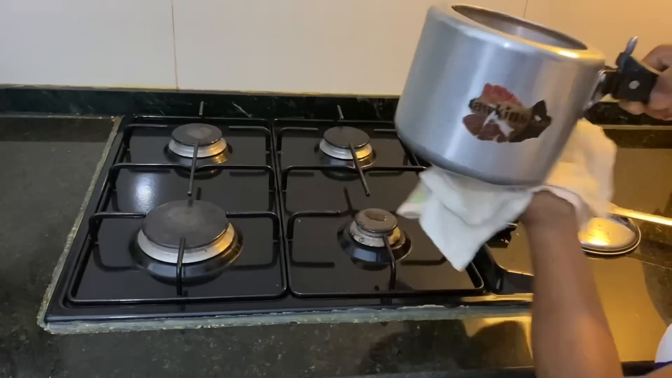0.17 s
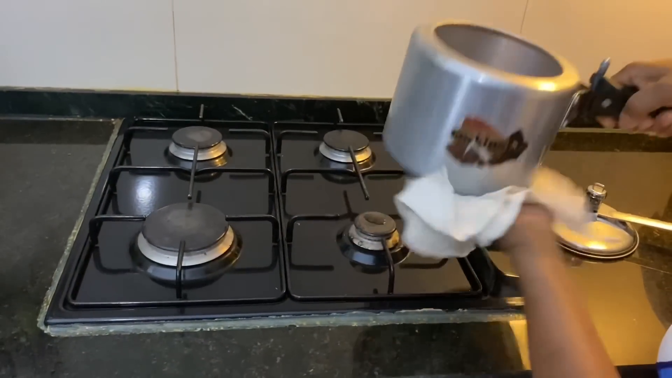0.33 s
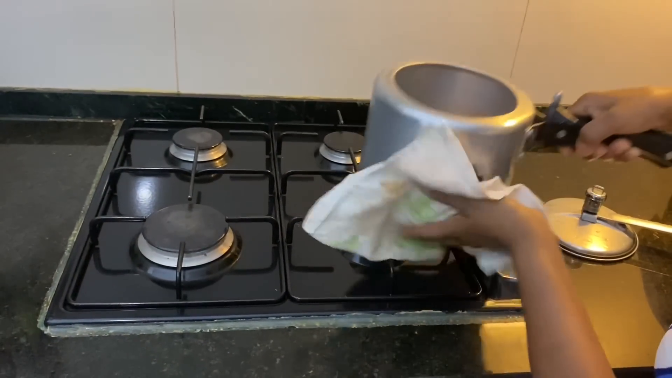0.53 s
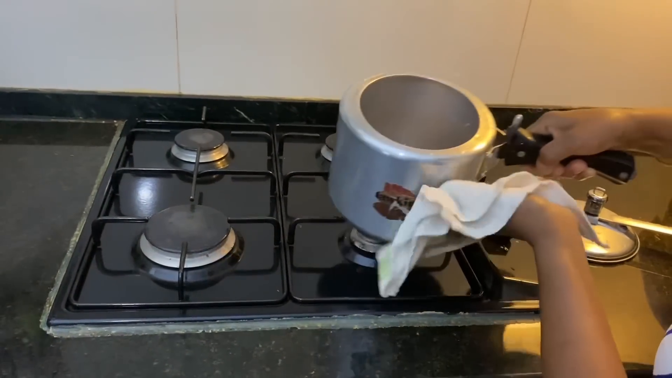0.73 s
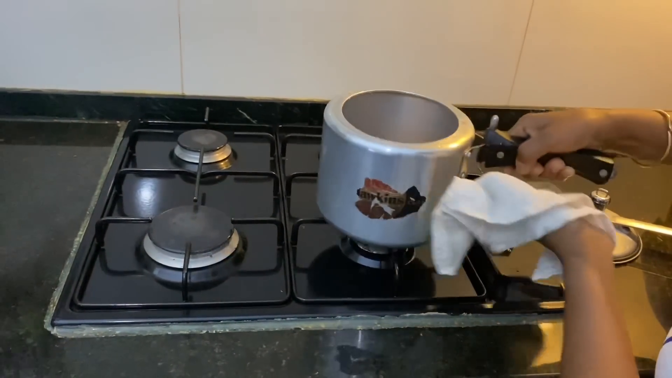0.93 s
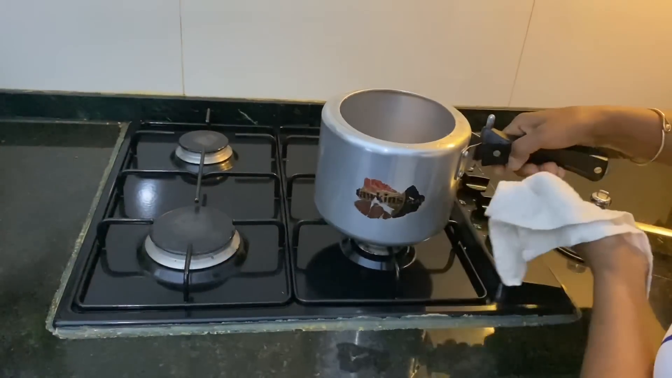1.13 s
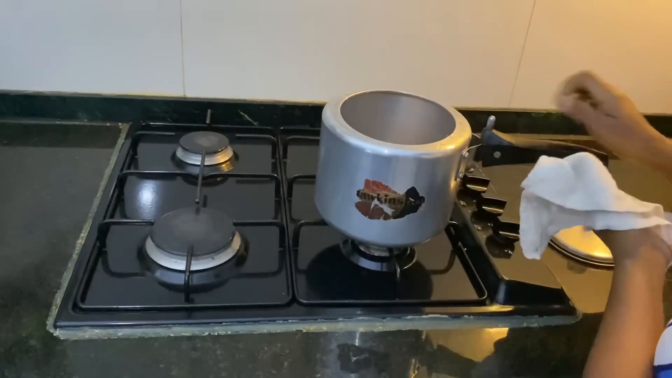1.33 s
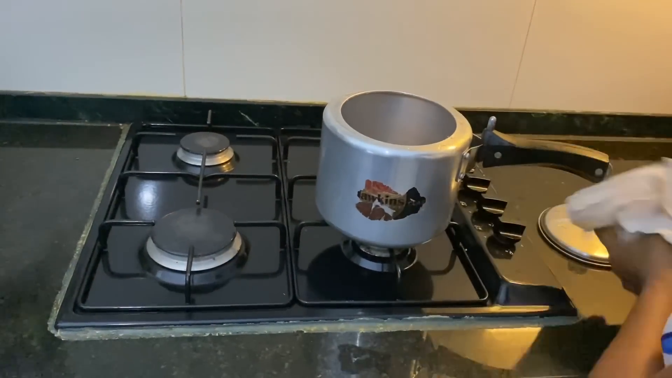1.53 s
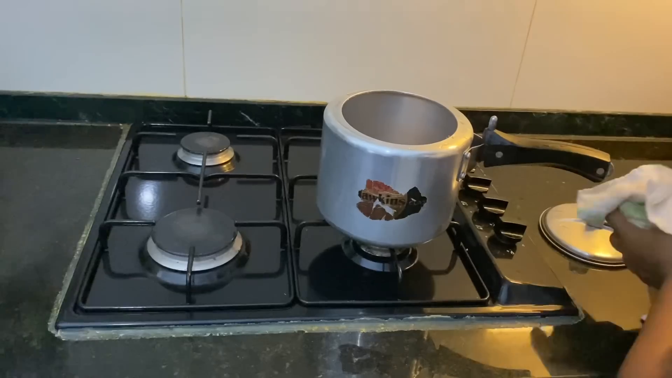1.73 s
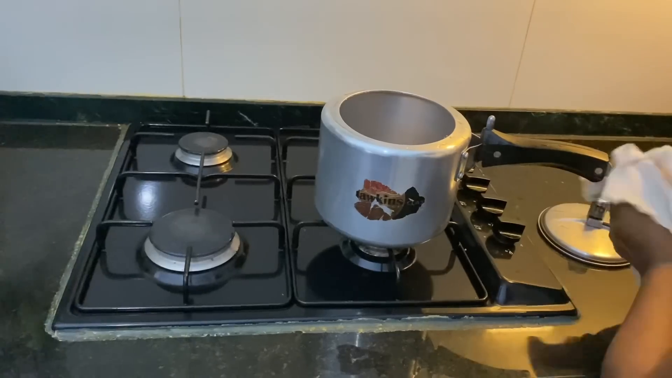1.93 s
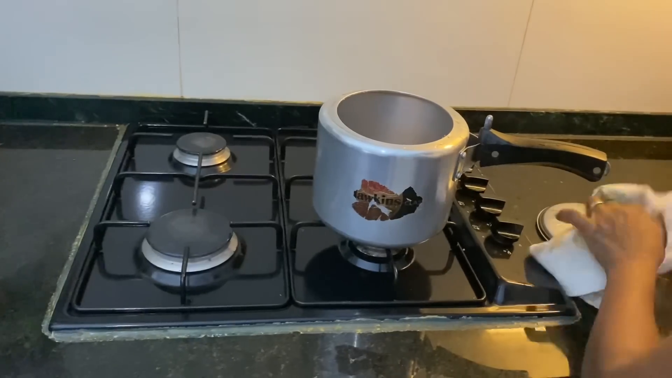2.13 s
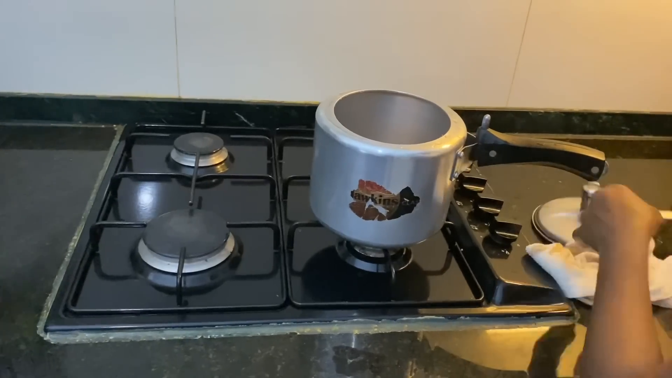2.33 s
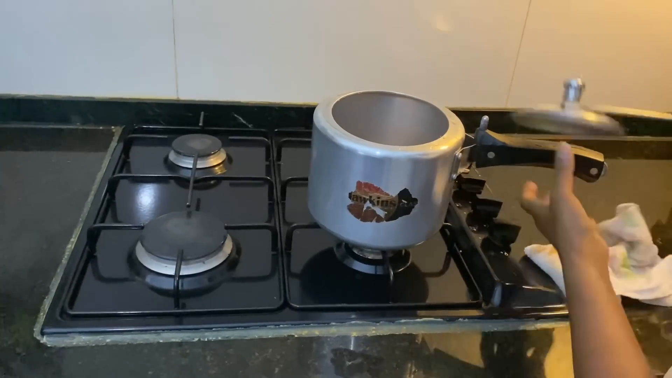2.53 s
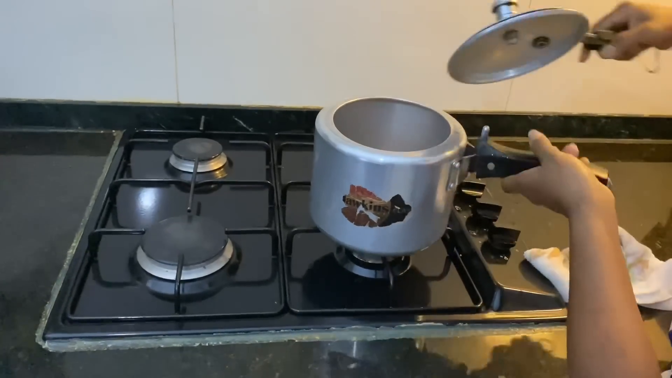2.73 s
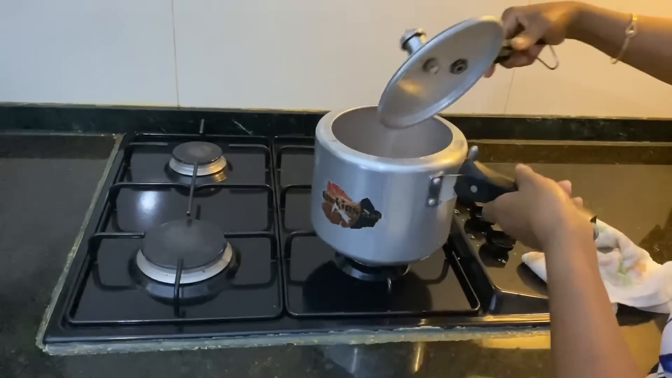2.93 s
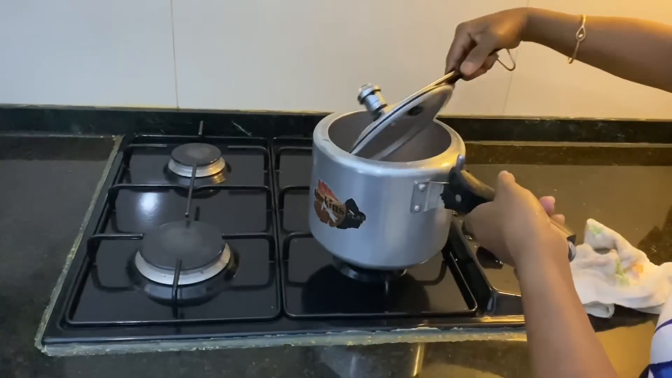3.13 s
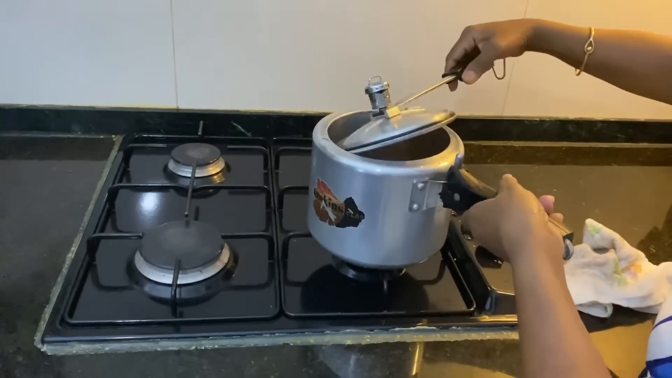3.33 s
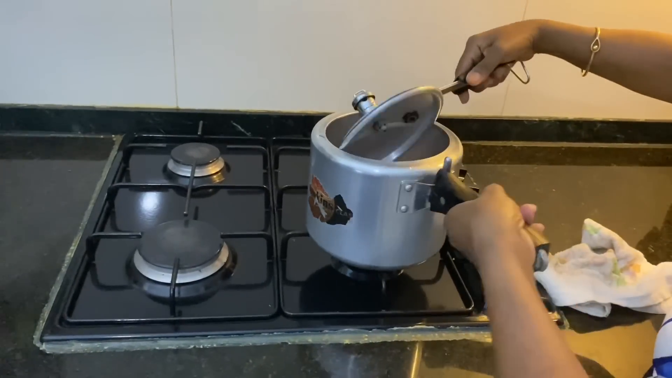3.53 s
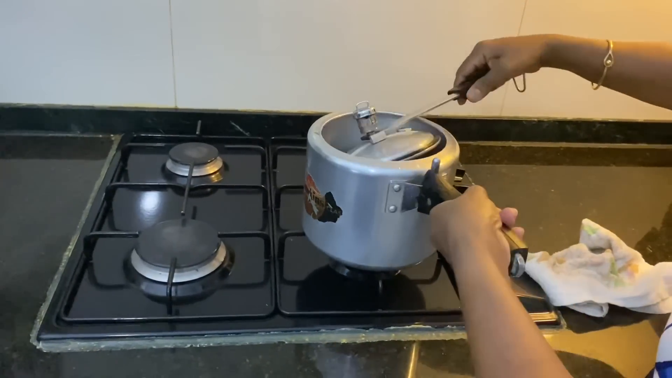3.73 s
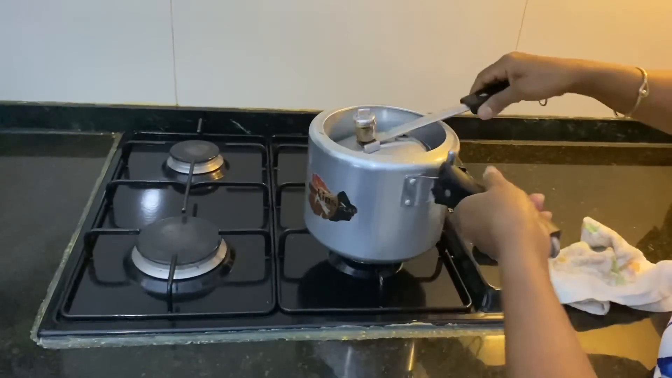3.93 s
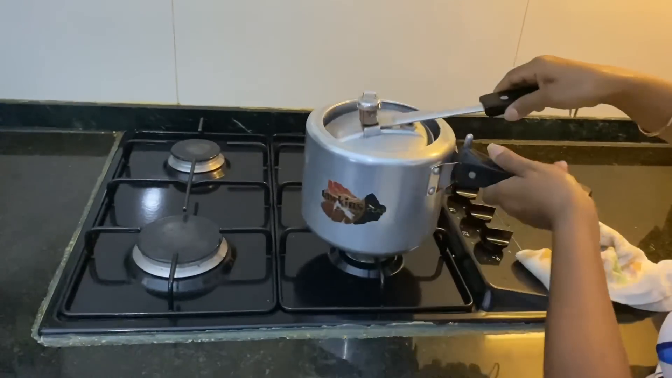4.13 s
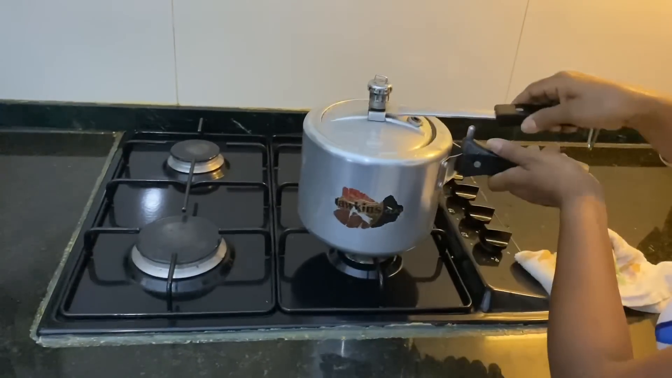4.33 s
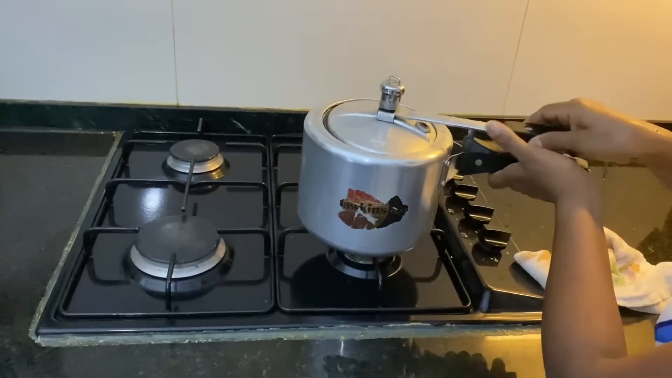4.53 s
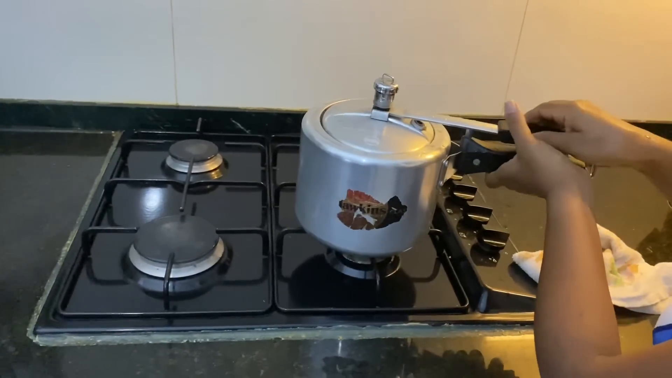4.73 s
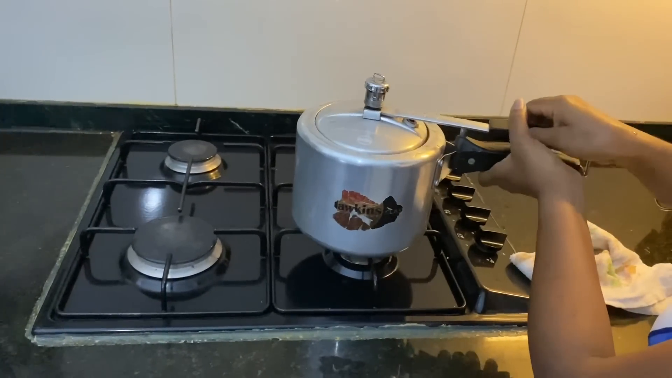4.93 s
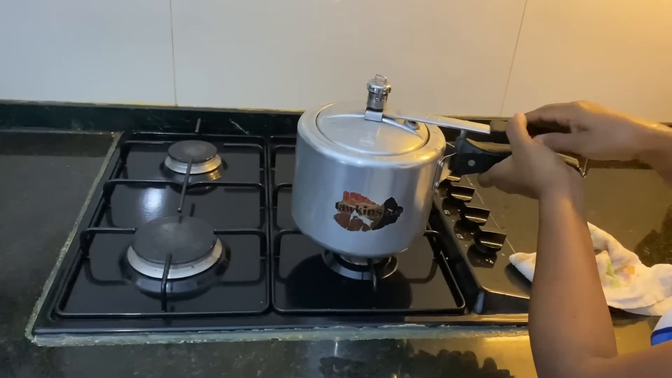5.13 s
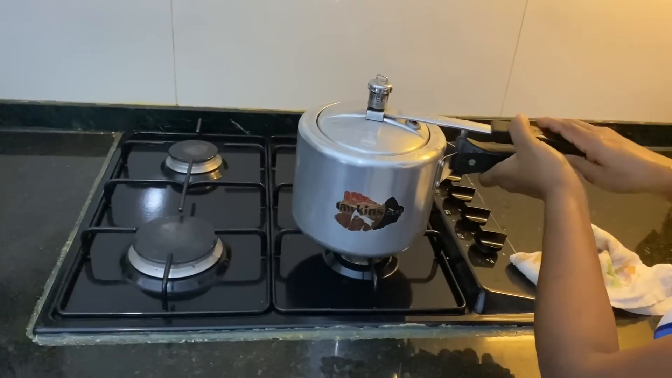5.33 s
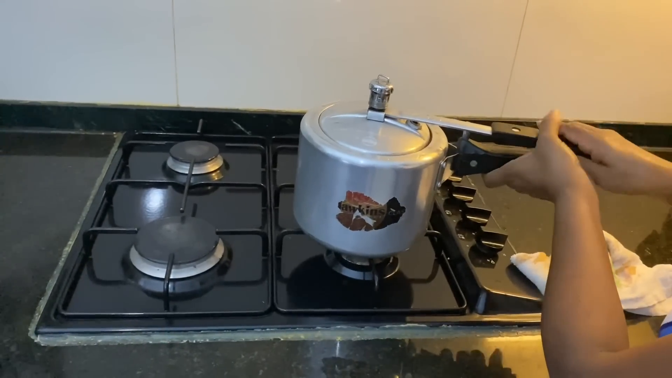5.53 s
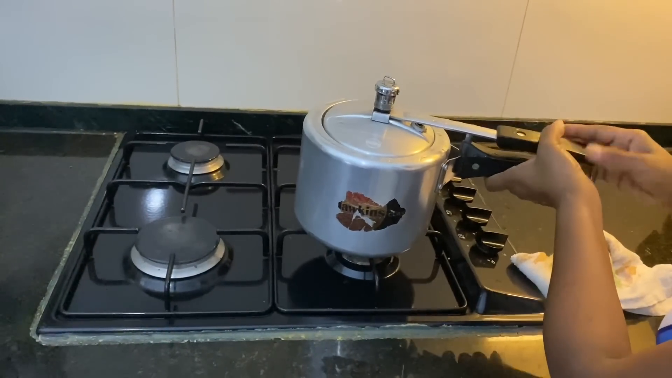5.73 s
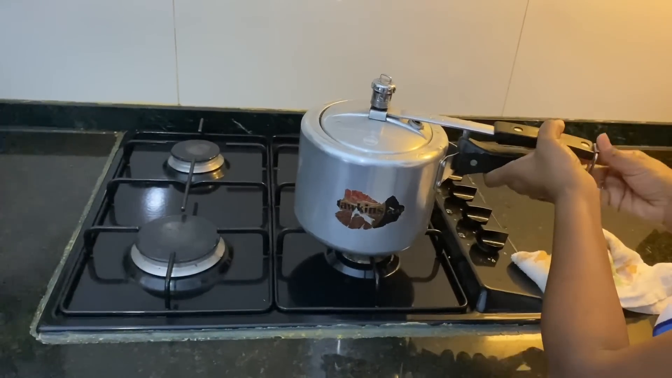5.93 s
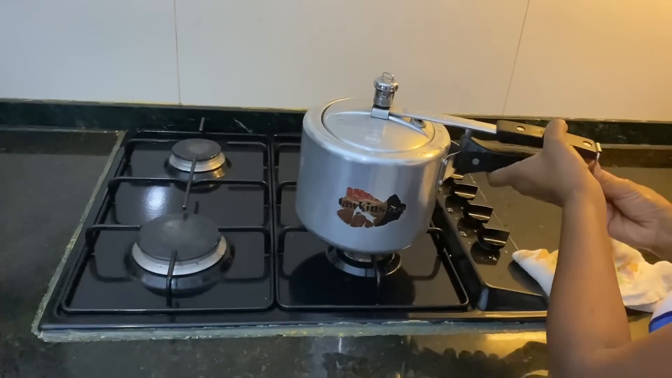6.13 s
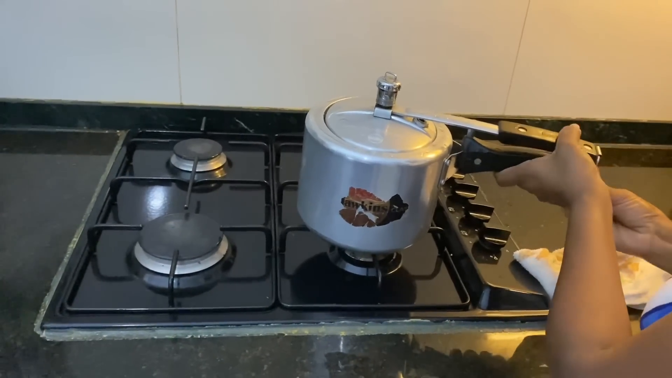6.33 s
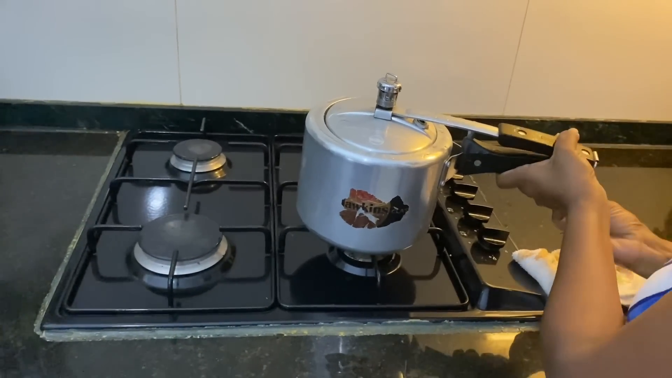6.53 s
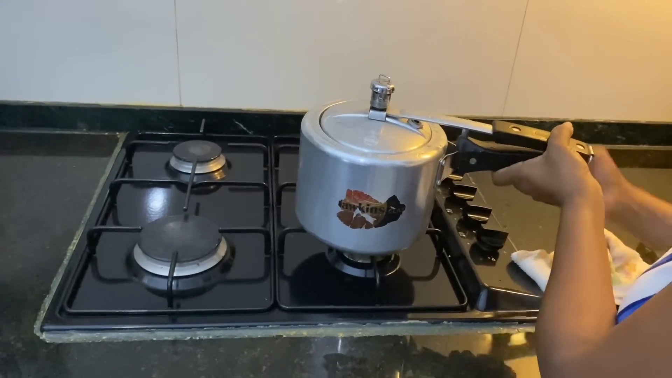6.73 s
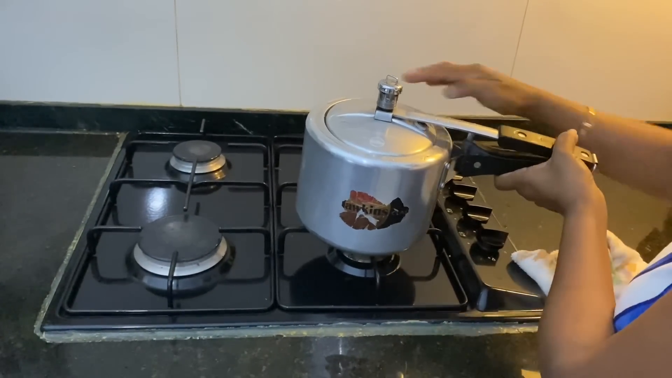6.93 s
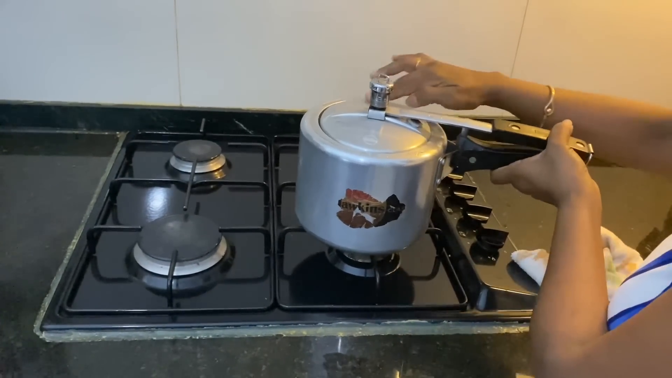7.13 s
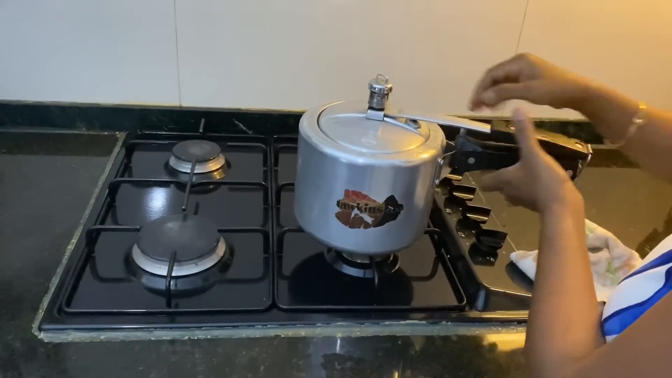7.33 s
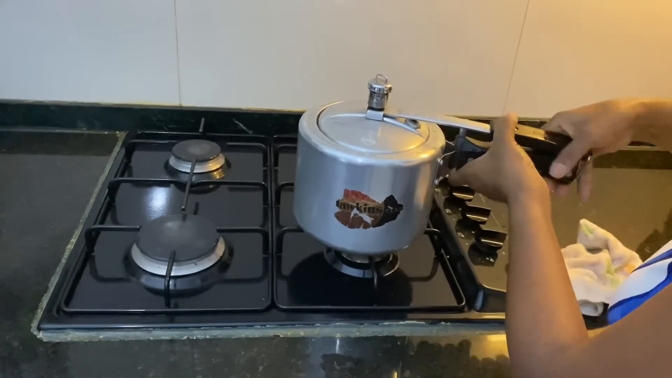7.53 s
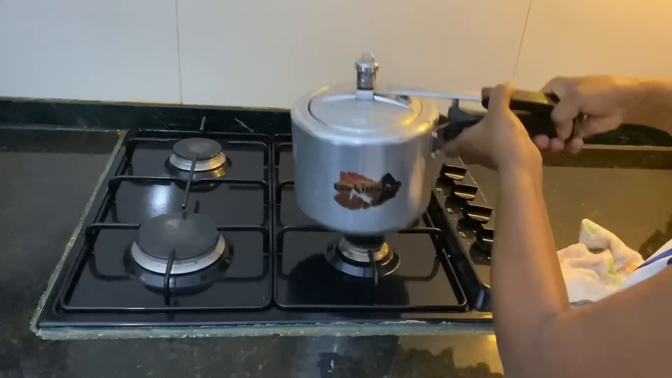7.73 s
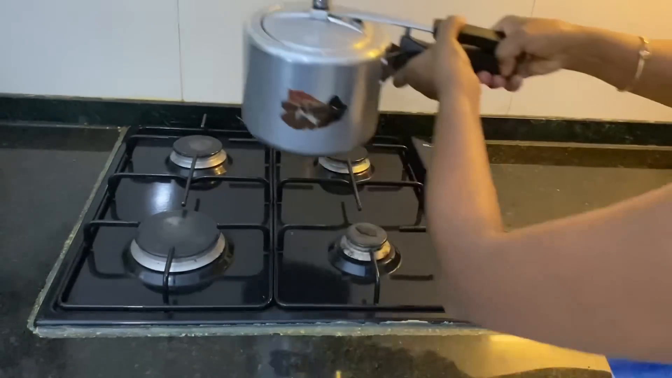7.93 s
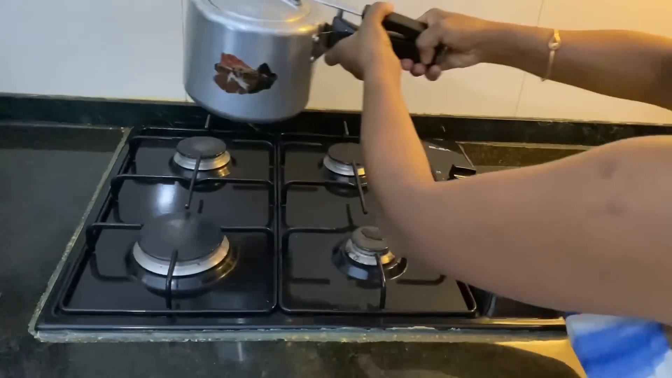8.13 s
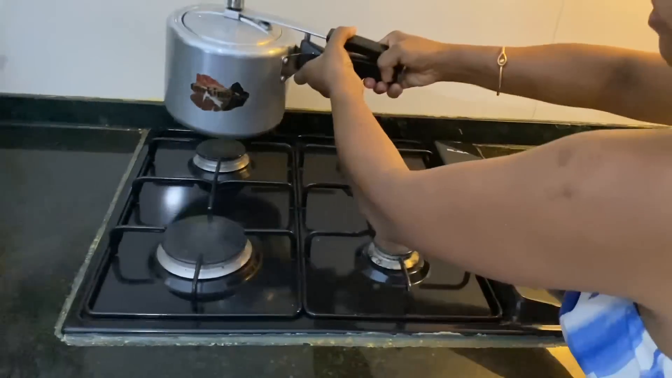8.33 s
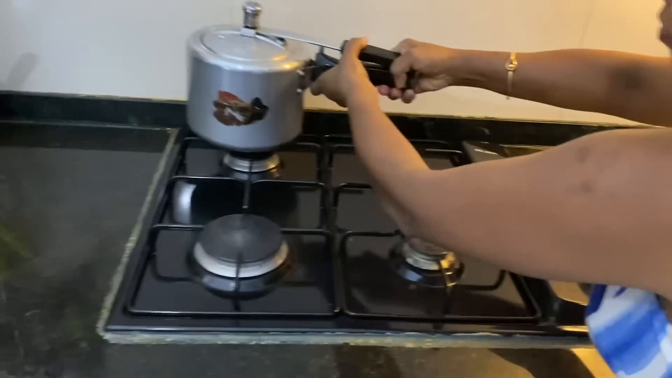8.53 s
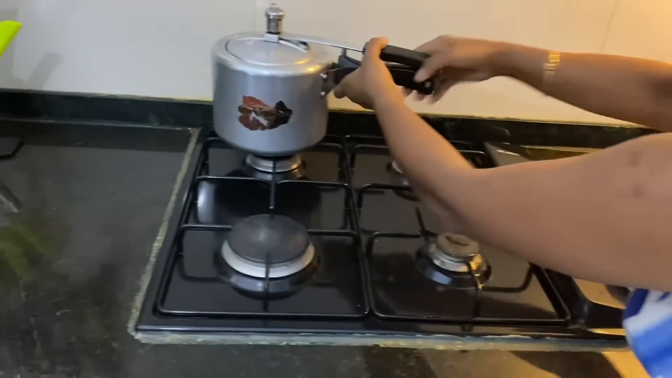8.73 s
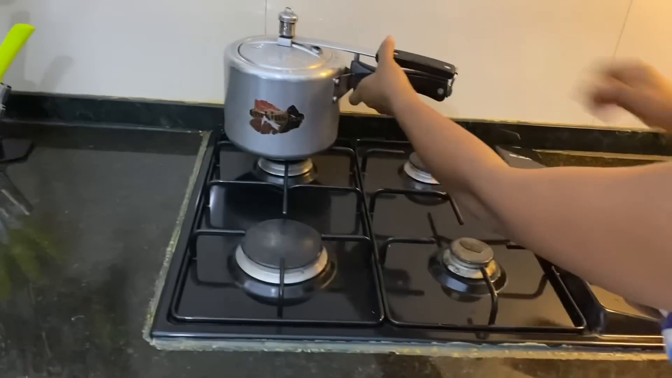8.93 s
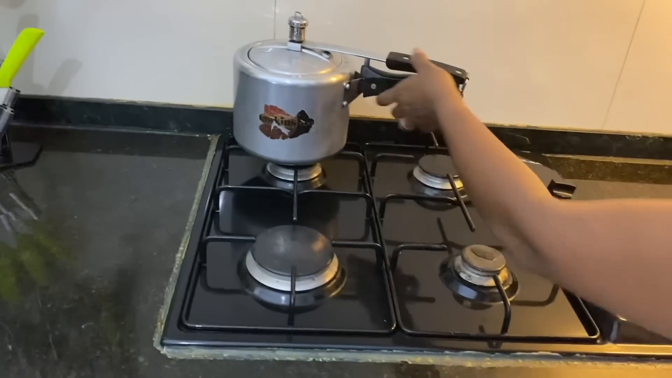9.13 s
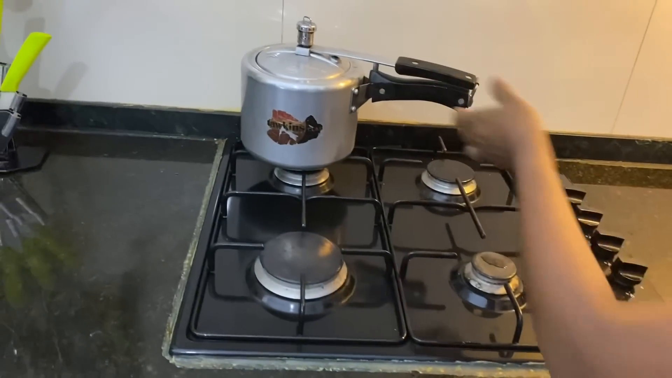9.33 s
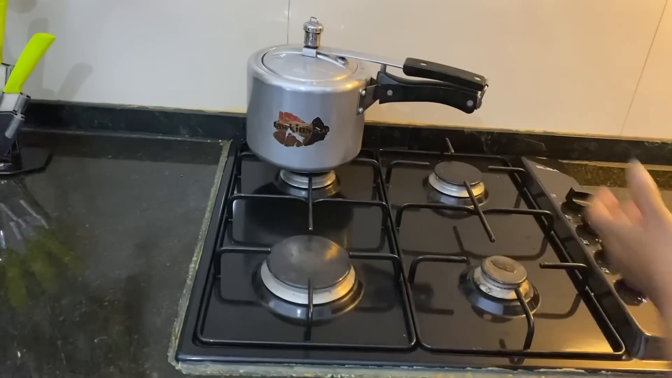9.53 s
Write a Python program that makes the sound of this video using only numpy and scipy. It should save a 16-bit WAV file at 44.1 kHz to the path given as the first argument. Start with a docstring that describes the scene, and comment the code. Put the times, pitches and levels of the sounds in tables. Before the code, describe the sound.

Close stereo phone pickup of an empty aluminium pot on a gas hob: dull double clunk with grate rattle, soft cloth rustle, lid lifted with light clinks, hard clanks and gritty metal sliding as it is fitted, dry clicks of handles and lock, a quiet gap, then a final heavy rattling set-down. Steady low hum and faint appliance noise, short bright room echo.

```python
"""The lid of an aluminium pressure cooker is slid in, turned and locked: each knock is a noise crack with decaying
modes of lid, wall and belly air; sliding drives the same metal and an air resonance with grains of noise.
Handles and lock click as short rough note clusters; the base bumps and rattles on an iron grate; a cloth rustles.
Mains hum and patchy appliance noise fill a hard-walled kitchen, and a phone spreads the treble in stereo."""
import sys
import numpy as np
from scipy import signal
from scipy.fft import rfft, irfft, next_fast_len
from scipy.io import wavfile
from scipy.ndimage import uniform_filter1d, map_coordinates

SR = 44100
rng = np.random.default_rng(int(sys.argv[2]) if len(sys.argv) > 2 else 0)


def inscribe(sig):
    """Save sig as 16-bit PCM at rate SR to the path in sys.argv[1].

    A 1-D sig is mono; a 2-D sig holds one channel per row.
    Samples are clipped to [-1, 1] before scaling.
    """
    pcm = np.round(np.clip(np.atleast_2d(sig).T, -1, 1) * 32767)
    wavfile.write(sys.argv[1], SR, pcm.astype(np.int16))


N = 426888


def amp(db):
    """Decibels are logarithmic: 20 dB is a factor of ten in amplitude."""
    return np.exp(np.log(10) / 20 * np.asarray(db))


def unit(x):
    """Normalisation to an rms of 1 sets the mean power."""
    return x / np.sqrt(np.mean(x ** 2) + 1e-20)


def along(points, hz):
    """Interpolation of (Hz, value) points on a logarithmic frequency axis, as pitch is heard."""
    f, v = np.transpose(points)
    return np.interp(np.log(hz + 1), np.log(f + 1), v)


def wobble(rate):
    """Slow random modulation: a smooth curve through random knots, rate of them a second."""
    at = np.arange(0, N + 8, 8)
    knots = rng.standard_normal(int(N * rate / SR) + 4)
    return np.interp(np.arange(N), at, map_coordinates(knots, [at * rate / SR]))


def filtered(x, response):
    """Linear filtering: the spectrum is multiplied by a complex response of frequency."""
    n = x.shape[-1]
    m = next_fast_len(n + 8192)
    return irfft(rfft(x, m) * response(np.fft.rfftfreq(m, 1 / SR)), m)[..., :n]


def lowpass(x, corner_hz):
    """A steep zero-phase low-pass leaves the bass of a sound."""
    return filtered(x, lambda hz: 1 / (1 + (hz / corner_hz) ** 4))


def place(out, s, sound):
    """Superposition: a sound is added from its start in seconds."""
    out[round(s * SR):][:len(sound)] += sound


# Likeness of left and right in diffuse sound. Each row: frequency in Hz, correlation from 0 to 1.
PORT_LIKENESS = [(60, 0.94), (130, 0.69), (300, 0.64), (700, 0.06), (1400, 0.07), (3000, 0.41),
                 (7000, 0.51)]


def diffuse(pair, spectrum):
    """Coherence of a diffuse field: two unrelated signals are coloured and mixed to a set likeness."""
    def response(hz):
        turn = np.arccos(np.clip(along(PORT_LIKENESS, hz), -1, 1)) / 2
        return amp(along(spectrum, hz)) * [np.cos(turn), np.sin(turn)]
    mid, side = filtered(pair, response)
    return np.array([mid + side, mid - side])


def crack(colour, t60):
    """Impact noise: a bright tick dies first, while the bass rises and dies more slowly."""
    t = np.arange(SR // 4) / SR
    noise = filtered(rng.standard_normal(len(t)), lambda hz: amp(along(colour, hz)))
    bass = lowpass(noise, 900)
    edge = filtered(noise, lambda hz: 1 / (1 + (7000 / (hz + 1)) ** 4))
    treble = (noise - bass) * amp(-60 * t / t60) + 2.2 * edge * amp(-60 * t / 0.017)
    treble *= 1 - np.exp(-t / 0.0018)
    return treble + bass * amp(-60 * t / (1.9 * t60)) * (1 - np.exp(-t / 0.0039))


def ringing(hz, db, t60, rough, size=SR // 4):
    """Modal decay: each mode (column) is a dying sine; a random phase wander roughens the ring."""
    t = np.arange(size) / SR
    steps = rng.standard_normal((len(hz), len(t) // 10 + 1))
    wander = rough * np.cumsum(steps, axis=1).repeat(10, axis=1)[:, :len(t)]
    modes = amp(db - 60 * t / t60) * np.sin(2 * np.pi * hz * t + wander)
    return np.sum(modes, axis=0) * (1 - np.exp(-t / 0.00027))


def grains(lumpy_db):
    """Friction as shot noise: dense tiny impacts of uneven size come in lumps over steady noise."""
    ticks = (rng.random(N) < 4000 / SR) * rng.standard_normal(N)  # about 4000 impacts a second
    return unit(unit(ticks) * amp(lumpy_db * wobble(60)) + 0.81 * rng.standard_normal(N))


RISE_S = .005


def strokes(rows, channels):
    """Envelope of a movement (s, dB per layer, hold s, fall dB/s per layer): quick rise, hold, steady fall."""
    out, t = np.zeros((channels, N + SR)), np.arange(SR // 2) / SR
    for s, db, hold_s, fall in rows:
        falling_s = np.clip(t - RISE_S - hold_s, 0, None)
        shape = np.clip(t / RISE_S, 0, 1) * amp(np.c_[db] - np.c_[fall] * falling_s)
        part = out[:, round(s * SR):][:, :len(t)]
        part[:] = np.maximum(part, shape)  # where movements overlap, the louder counts
    return out[:, :N]


# Partials of the mains hum. Each row: multiple of the mains frequency, level in dB against the fundamental.
HUM_PARTIALS = [(1, 0), (2, -22), (3, -23), (4, -28), (5, -25), (6, -28), (9, -29)]
# Colour of the appliance noise. Each row: frequency in Hz, relative level in dB per Hz.
APPLIANCE_COLOUR = [(22, -19.5), (45, -3), (70, 10), (90, -0.5), (304, -9.5), (448, -9), (602, -12),
                    (839, -19.5), (1130, -23.5), (1430, -30.5), (2680, -30), (5720, -53), (7000, -30),
                    (7400, -44.5), (11000, -44), (13000, -46.5), (17000, -68)]
MAINS_HZ, HUM_DB, KITCHEN_DB = 59.7, -44, -51.5  # mean frequency, fundamental and noise levels
DIP_S, DIP_DB, DIP_WIDTH_S = 5.6, -7, .015  # the hum dips briefly once
HUM_WAVER_DB, HUM_WAVER_RATE = .6, 8  # spread of the level in dB, knots a second


def kitchen():
    """Harmonic series and diffuse noise: an unsteady mains hum lies over patchy appliance noise."""
    t = np.arange(N) / SR
    phase = 2 * np.pi * MAINS_HZ * t + 0.32 * wobble(0.95)
    hum = sum(amp(db + 0.9 * (k > 1) * wobble(11)) * np.sin(k * phase + k * k) for k, db in HUM_PARTIALS)
    dip_db = DIP_DB * np.exp(-((t - DIP_S) / DIP_WIDTH_S) ** 2)
    hum *= np.sqrt(2) * amp(HUM_DB + dip_db + HUM_WAVER_DB * wobble(HUM_WAVER_RATE))
    z = signal.stft(rng.standard_normal((2, N)), nperseg=512)[2]
    # random levels smoothed over frequency, then time, make the noise patchy
    patches = uniform_filter1d(rng.standard_normal(z.shape[1:]), size=6, axis=0)
    patches = uniform_filter1d(patches, size=14, axis=1)
    pair = signal.istft(z * amp(0.8 * unit(patches)), nperseg=512)[1][:, :N]
    return hum + amp(KITCHEN_DB) * unit(diffuse(pair, APPLIANCE_COLOUR))


# An earlier knock still rings in the empty pot. Each row: frequency in Hz, level in dB, t60 in seconds.
LAST_RING = [(940, -61, 1), (4430, -94.5, .8), (6620, -67, 1)]


def linger():
    """Free decay: the last of a ring that began earlier dies away at the start."""
    hz, db, t60 = np.transpose(LAST_RING)[:, :, None]
    sound = ringing(hz, db, t60, rough=0.1, size=SR // 2)
    return np.pad(sound, (0, N - len(sound)))


# Course of the rustling. Each row: time in seconds, level in dB before a common trim.
CLOTH_LEVELS = [(0, -58.5), (.61, -59.5), (.76, -71), (.9, -67), (1.25, -53), (1.33, -62), (1.52, -64),
                (2.25, -67), (5.3, -68), (5.82, -57.5), (6.0, -62), (6.5, -65), (6.73, -71.5), (7.15, -67),
                (7.75, -71), (8.04, -69.5), (8.23, -67.5), (9.25, -70.5), (9.371, -89), (9.68, -55)]
# Colour of the rustling. Each row: frequency in Hz, relative level in dB per Hz.
CLOTH_COLOUR = [(500, -2.5), (1500, -5.5), (3000, 2), (7000, -4.5), (11000, -3), (13000, -10), (15500, -14),
                (17000, -35.5)]


def cloth():
    """Friction noise: cloth and hands rub softly, fine grains in a hiss."""
    fine = rng.standard_normal(N) * amp(1.2 * wobble(25) + 1.2 * wobble(400))
    hiss = unit(filtered(fine, lambda hz: amp(along(CLOTH_COLOUR, hz))))
    return amp(np.interp(np.arange(N) / SR, *np.transpose(CLOTH_LEVELS)) - 4.5) * hiss


# The base rattles after it lands or shifts. Each row: start in seconds, treble level in dB before a common
# trim, hold in seconds, bass over treble in dB.
RATTLES = [(0.919, -27, 0.053, 2), (1.046, -25, 0.048, 1.5), (2.717, -28.5, 0.25, 1.7),
           (2.891, -19, .021, -2.5), (7.589, -60.5, .06, 10.5), (7.657, -44.5, .004, 3.5),
           (8.592, -23.5, .02, 3), (8.625, -26, 0.094, 0.5), (8.758, -30, 0.0049, 3.5),
           (8.987, -42.5, .004, 1), (9.192, -47, 0.0039, 4)]
# Colour of grate and hob top. Each row: frequency in Hz, relative level in dB per Hz.
GRATE_COLOUR = [(35, -26.5), (60, -3), (185, -7), (261, -3.5), (301, -10), (368, 2.5), (498, -7.5),
                (744, -6), (3370, -10), (7400, -25), (9620, -27), (11000, -25), (15500, -38), (17000, -57)]
RATTLE_FALL, RATTLE_BASS_FALL = 170, 130  # dB/s


def rattle():
    """Forced vibration: tiny impacts sound through iron grate and hob top, the bass dying more slowly."""
    broad = filtered(grains(lumpy_db=4.5), lambda hz: amp(along(GRATE_COLOUR, hz)))
    low = lowpass(broad, 800)
    falls = [RATTLE_FALL, RATTLE_BASS_FALL]
    rows = [(s, [db, db + bass_db], hold, falls) for s, db, hold, bass_db in RATTLES]
    return amp(-3.0) * np.sum(strokes(rows, channels=2) * [unit(broad - low), unit(low)], axis=0)


# The pot base meets the grate. Each row: start in seconds, strength in dB before a common trim, then the
# relative weights in dB of the wall (near 1 kHz) and the edge (treble).
BASE_CONTACTS = [(0.9111, -16, -3.5, -22), (0.9261, -10.5, -4, -12.5), (0.9569, -12.5, -27, -15.5),
                 (1.036, -11.5, -3, -12.5), (1.0822, -17, -15, -19), (1.8327, -44.5, 1.5, -24.5),
                 (2.655, -39, 6, -41), (2.7072, -26, -4, -17), (2.7235, -10.5, -11, -7.5),
                 (2.8415, -14, -26, -15.5), (2.8919, -7.5, -6, -9), (2.9198, -12, -4, -16),
                 (2.9762, -20.5, -14, -15), (7.6624, -43, 16, -33), (8.5859, -17.5, -10, -5),
                 (8.5928, -9, 0.5, -7.5), (8.6407, -13, 0, -12.5), (8.7128, -14.5, -10, -8),
                 (8.7634, -9, -0.5, -13.5), (8.9924, -47, 14, -22), (9.1927, -52.5, 24, -27)]
THUD_DB, BUMP_T60 = -12, 0.072  # bass weight before offsets; decay of the mid-range in s


def bumps():
    """Heavily damped impact: the thick base on cast iron hardly rings, a dull broad crack."""
    out = np.zeros(N + SR)
    for s, db, wall_db, edge_db in BASE_CONTACTS:
        colour = [(40, THUD_DB - 20.5), (120, THUD_DB + 10.0), (500, THUD_DB + 15.0), (1050, wall_db + 10),
                  (2500, 0.69), (6500, -3), (11000, edge_db + 8), (16000, edge_db + 1)]
        place(out, s, amp(db - 3.5) * crack(colour, BUMP_T60))
    return out[:N]


# Handles, lock and valve click. Each row: start in seconds, strength in dB before a common trim, main note
# in Hz, then the relative weights in dB of that note, the low range and the edge (treble).
SMALL_PARTS = [(0.787, -57.5, 4660, 2, -20, -6.5), (0.824, -55, 7300, 3, -40, -30),
               (5.1374, -25, 2185, -15, -9.5, -27.5), (5.1797, -39.5, 1490, 1.5, -3, -10),
               (5.286, -36, 2730, -6, -10, -14.5), (5.301, -27.5, 2483, 5.5, -43, -7.5),
               (5.4142, -22.5, 2710, 3, -7, -25), (5.5528, -31, 3400, -15, -10, -33.5),
               (5.6701, -28, 2580, -15, -9, -33.5), (5.723, -42.5, 2300, 8, -12, -16),
               (5.7548, -47.5, 2530, 0, -13, -12), (5.849, -33.5, 2330, 0, -3.5, -7),
               (5.9603, -53, 2280, 7, -19, -10.5), (6.0002, -42, 2340, 3.5, -8, -10.5),
               (6.0654, -26.5, 2690, -5.5, -21, -8.5), (6.2938, -29.5, 3220, -13, -23, -40),
               (6.4814, -24, 2736, -0.5, -28, -27), (6.7178, -45.5, 1780, -12, 4, -33),
               (6.8904, -52, 2894, -5, -15, -21), (7.1037, -31.5, 2280, -18, -5, -44)]
NOTE_T60, CLICK_T60 = 0.04, 0.048  # s, notes and mid-range of the crack
NOTE_SPREAD = 0.049  # neighbours of the main note, as a fraction above and below


def clicks():
    """Damped modes: small parts held in the hand give a dry crack with a rough, short cluster of notes."""
    out = np.zeros(N + SR)
    for s, db, main_hz, main_db, low_db, edge_db in SMALL_PARTS:
        colour = [(200, low_db + 3), (800, low_db + 12), (main_hz / 1.23, -4), (main_hz, 3), (main_hz * 1.21, -4),
                  (10500, edge_db + 7.0), (12000, edge_db + 4.5), (16000, edge_db - 1.5)]
        notes_hz = main_hz * (1 + NOTE_SPREAD * np.array([[-1], [0], [1]]))
        sound = ringing(notes_hz, main_db - 4.5, NOTE_T60, rough=0.43)
        sound[:SR // 4] += amp(5.5) * crack(colour, CLICK_T60)
        place(out, s, amp(db - 2.5) * sound)
    return out[:N]


# Modes of lid and pot wall. Each row: frequency in Hz, relative level in dB, t60 in seconds when free.
METAL_MODES = list(zip([865, 1037, 1205, 1307, 2040, 2110, 2288, 2637, 2724, 2805, 2975, 3700, 4138, 4264, 4510, 5270, 5640, 5868, 6600, 7200],
               [-4, 0.5, -9, -4, -12, -8, -10, 0.5, -6, -4, -12, -14, -3, -6, -8, -16, -12, -14, -16, -14],
               [.3, .45, .3, .3, .4, .25, .3, .55, .15, .3, .4, .3, .45, .55, .35, .3, .15, .25, .3, .25]))
# The lid slides on metal. Each row: start in seconds, hiss level in dB before a common trim, hold in seconds,
# fall in dB/s, then the weights of belly and ringing in dB against the hiss.
SLIDES = [(2.26, -35, 0.056, 180, -39, -6.5), (2.437, -42, 0.016, 117, -26, -5.5),
          (2.645, -47, .07, 198, 12, -4), (3.116, -28, 0.0035, 154, -5.5, 2),
          (3.266, -33.5, 0.0028, 300.5, -5, 3), (3.3, -45, 0.039, 28, 2.5, -1),
          (3.631, -24.5, 0.045, 151.5, -5, 2.5), (3.813, -39, 0.33, 203, 2, -1.6),
          (4.122, -36.5, .004, 329.5, 7, 3), (4.184, -25, 0.041, 90.5, -8.5, 2.5),
          (4.431, -27, 0.025, 202, -14, -0.5), (4.484, -33, .02, 57.5, -11, -1),
          (4.621, -32.5, .02, 200, -4, -1), (4.639, -26, .03, 220, -9, -3),
          (4.861, -38.5, 0.026, 200, 0.5, -8), (4.882, -29.5, 0.013, 600.5, -10, -8.5),
          (4.923, -45, .01, 80, 3, -15), (5.137, -40, 0.021, 140, -1.5, -2.5)]


def resonance(hz, centre_hz, width_hz):
    """A driven resonator passes most at its centre; damping sets its width."""
    return 1j * hz * np.sqrt(width_hz) / (centre_hz ** 2 - hz ** 2 + 1j * hz * width_hz)


def scrape():
    """Driven resonance: grains of friction hiss, boom in the belly and keep the modes, widened by contact, sounding."""
    rub = grains(lumpy_db=4.0)
    colour = [(50, -24.5), (120, 8.0), (280, -5.5), (900, -1.5), (3000, -3.5), (8000, -9.5), (16000, -20.5)]
    hiss = unit(filtered(rub, lambda hz: amp(along(colour, hz))))
    belly = unit(filtered(rub, lambda hz: resonance(hz, 395, 70)))

    def all_modes(hz):  # neighbours sound in opposite sign
        return sum((-1) ** k * amp(db) * resonance(hz, mode_hz, 9 / t60)
                   for k, (mode_hz, db, t60) in enumerate(METAL_MODES))
    metal = unit(filtered(rub, all_modes))
    rows = [(s, [db, db + belly_db, db + ring_db], hold, [fall])
            for s, db, hold, fall, belly_db, ring_db in SLIDES]
    return amp(-6.0) * np.sum(strokes(rows, channels=3) * [hiss, belly, metal], axis=0)


# Lid against pot. Each row: start in seconds, strength in dB before a common trim, then the relative weights
# in dB of belly, wall, lid and rim, and the freedom to ring from 0 to 1.
LID_KNOCKS = [(2.2492, -25, -15.5, -25, -12.5, -40, .7), (2.3003, -21.5, 9.5, 0.8, -5, -29, 0.24),
              (2.4448, -20.5, -16, -8.5, -9, -31, 0), (2.5124, -33, -14, -14, -14, -27.5, .3),
              (2.599, -42, -13, -15, -12.5, 1.5, 0.1), (3.0856, -8, -8, 2, -6.5, -30.5, 0.06),
              (3.1038, 0.06, -9, -1, -11.5, -15, 0.13), (3.1686, -15, -24, -7.5, -6.5, -1.5, 0),
              (3.2663, -14, -5, -18, -14.5, -11.5, 0.3), (3.466, -34.5, 5.9, -33.5, -10.5, -31.5, 0.14),
              (3.5913, -27, -19.5, -3.5, -3, -6, 1), (3.6145, 4.5, -6, -19, -14.5, -17, 0.17),
              (3.6646, -5, -6, -22.5, -17, -26, 0.3), (3.6918, -4.5, -12, -19, -10.5, -7, 0),
              (4.0028, -19, 3, -14, -8, -16.5, 0.07), (4.0581, -31, -1.5, -16, -4.5, -30, .5),
              (4.1158, -24.5, -13, 2.2, 2, -36.5, 0.35), (4.1874, -12.5, -2.5, 2.5, -6, -10.5, 0.45),
              (4.2382, -7.5, -9, -3, -2, -31.5, 0.45), (4.2686, -6, -2.5, -30.5, -10, -28, .17),
              (4.335, -8, -22.5, -18, -5.5, -12, 0), (4.3789, -9.5, -19, -9, -9.5, -27.5, 0.3),
              (4.4343, -9.5, -19.5, -3.5, 0, -24, 0), (4.4587, -21, -21.5, -13, -19, 7, 0),
              (4.4965, -19.5, -9, -9, -14, -20, 0.26), (4.6461, -7, -18.5, -6, -21, -28, 0.1),
              (4.668, -14.5, -11, -21, -21, -25.5, 0.15), (4.6852, -18, -22, -16, -1, -26, 0.27),
              (4.7217, -28, -5.5, -16, -12, -23, 0.3), (4.8463, -33.5, 2.5, 6, -0.5, -4, .12),
              (4.8806, -11, -9, -5, 4, -20, 0), (8.3376, -47.5, -16, -5, 2.5, -24, 0.52)]
# As the lid moves, belly pitch, favoured modes and crack edge change. Each row: time in seconds, belly, wall
# and lid frequencies in Hz, relative edge level in dB.
LID_POSITIONS = [(2.25, 592, 800, 2850, -12), (2.3, 596, 850, 2580, -19), (2.45, 542.4, 1250, 2640, -23),
                 (3.1, 475, 1122, 2700, -22.5), (3.62, 433.6, 1180, 2450, -19),
                 (4.06, 403.3, 900, 2900, -26.5), (4.19, 366, 1030, 2680, -21.5),
                 (4.24, 340, 1010, 2560, -21), (4.271, 246, 1032, 2670, -16), (4.43, 265, 900, 2710, -25),
                 (4.46, 265, 850, 2640, -19.5), (4.7, 254, 851, 2670, -24), (4.85, 382, 854, 2720, -23.5),
                 (8.3, 299.5, 1303, 2100, -28)]
KNOCK_T60 = 0.062  # s, mid-range of the crack
DETUNE, SCATTER_DB = .007, 3  # random spread per contact: of pitch as a fraction, of each mode's level


def lid():
    """Modal excitation: a contact cracks, rings modes near its spot and thumps the shut-in air; a grip damps it."""
    out = np.zeros(N + SR)
    hz, level_db, t60 = np.transpose(METAL_MODES)[:, :, None]
    times, *courses = np.transpose(LID_POSITIONS)
    for s, db, belly_db, wall_db, lid_db, rim_db, free in LID_KNOCKS:
        belly_hz, wall_hz, lid_hz, edge_db = (np.interp(s, times, course) for course in courses)
        spot = [(wall_hz / 1.4, wall_db - 9), (wall_hz, wall_db), (wall_hz * 1.3, wall_db - 8),
                (lid_hz / 1.35, lid_db - 7), (lid_hz, lid_db),
                (3400, lid_db - 7.5), (4200, rim_db), (5200, -9), (7200, -11)]
        free = np.clip(free, .1, 1.5)
        scatter_db = SCATTER_DB * rng.standard_normal(hz.shape)
        strength_db = level_db + 4.0 + along(sorted(spot), hz) + scatter_db
        detuned_hz = hz * (1 + DETUNE * rng.standard_normal())
        sound = ringing(detuned_hz, strength_db, t60 * free, rough=.11)
        sound += ringing(np.array([[belly_hz]]), belly_db + 4.0, 0.33 * free, rough=0.1)
        colour = [(40, -20), (130, belly_db / 2 - 11), (500, belly_db / 2 + 3.0), (wall_hz, wall_db / 2 + 9.5),
                  (1700, -3), (lid_hz, lid_db / 2 + 2.5), (3450, -3), (4200, rim_db / 2 + 10.5), (5200, -3),
                  (7000, -3), (11000, edge_db + 12.5), (16000, edge_db - 4.0)]
        sound[:SR // 4] += amp(4.0) * crack(colour, KNOCK_T60)
        place(out, s, amp(db - 9.5) * sound)
    return out[:N]


# Reverberation of the kitchen. Each row: frequency in Hz, t60 in seconds.
WALL_DECAY = [(150, 0.81), (400, 0.43), (1000, 0.63), (2800, 0.46), (7300, 0.36), (15000, 0.38)]


def room(x):
    """Reverberation: hard walls answer; each quarter second is given a fresh random tail."""
    out, step = np.zeros((2, N + SR)), SR // 4
    for start in range(0, N, step):
        hz, t, z = signal.stft(rng.standard_normal((2, SR // 2)), SR, nperseg=256)
        decay = amp(-60 * t / along(WALL_DECAY, hz)[:, None])
        tail = signal.istft(z * decay, SR, nperseg=256)[1]
        wet = signal.fftconvolve(x[None, start:start + step], tail / np.linalg.norm(tail[0]), axes=1)
        out[:, start + 100:][:, :wet.shape[1]] += wet  # the answer comes 100 samples late
    return diffuse(out[:, :N], [(100, -0.26), (1000, -1.5), (10000, -1.84)])


# Direct sound between the ports. Each row: frequency in Hz, left minus right level in dB.
PORT_LEAN = [(100, -1), (220, -1), (550, -0.5), (1400, 0.6), (4500, 4), (8000, 3.5)]
ROOM_DB = -2.5


def scene():
    """Interaural-style cues: the pot stands a little to the left, so direct sound reaches the left port first."""
    pot = linger() + cloth() + rattle() + bumps() + clicks() + scrape() + lid()

    def lead(hz):
        level = amp(np.outer([.5, -.5], along(PORT_LEAN, hz)))
        return level * np.exp(1j * np.outer([1, -1], 0.63 * hz / (hz + 1500)))
    return filtered(np.array([pot, pot]), lead) + amp(ROOM_DB) * room(pot) + kitchen()


TOP_HZ = 17100  # nothing passes from here up


def record(dry):
    """Phase stereo: above 7 kHz the phone spreads one signal, left to right turning once every 4.2 kHz."""
    mid, side = (dry[0] + dry[1]) / 2, (dry[0] - dry[1]) / 2

    def half_turn(hz):
        ramp = 2 * np.pi * np.clip(hz - 7000, 0, None) / 4200
        return (ramp - 0.2 * np.sin(2 * ramp)) / 2  # the turn is slightly uneven

    def keep_side(hz):
        return np.clip((7000 - hz) / 1500, 0, 1) + 0.4 * np.abs(np.sin(2 * half_turn(hz)))
    side = filtered(side, keep_side) + filtered(mid, lambda hz: 1j * np.sin(half_turn(hz)))
    mid = filtered(mid, lambda hz: np.cos(half_turn(hz)))
    pair = np.array([mid + side, mid - side])
    pair = pair / (1 + np.abs(pair / .9) ** 6) ** (1 / 6)  # a smooth limit keeps the peaks in range
    return filtered(pair, lambda hz: amp(along([(15500, -0.5), (17000, -32.5)], hz)) * (hz < TOP_HZ))


dry = scene()
out = record(dry)
inscribe(out)
```